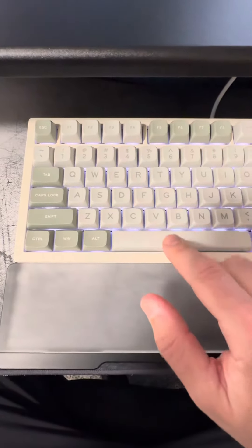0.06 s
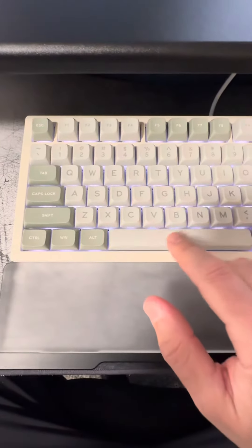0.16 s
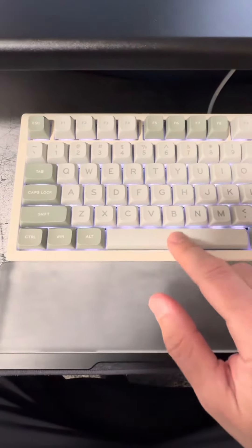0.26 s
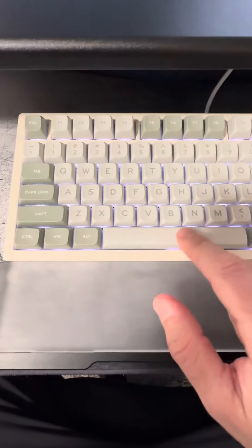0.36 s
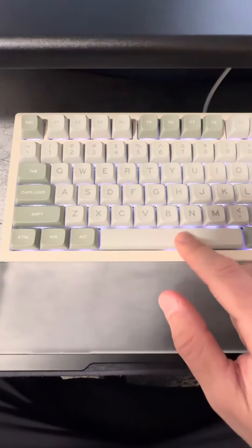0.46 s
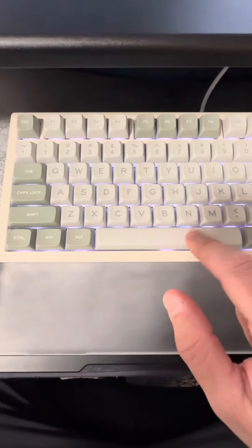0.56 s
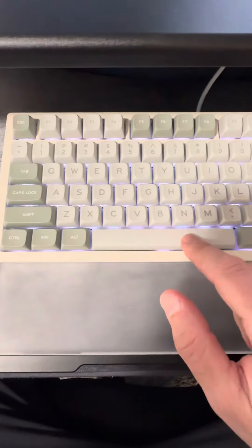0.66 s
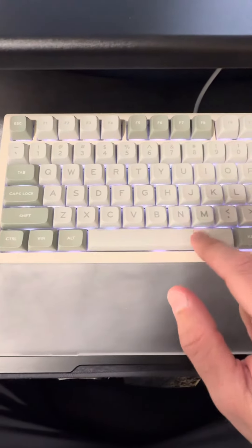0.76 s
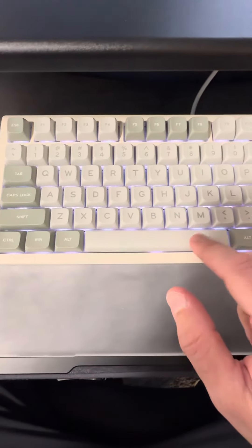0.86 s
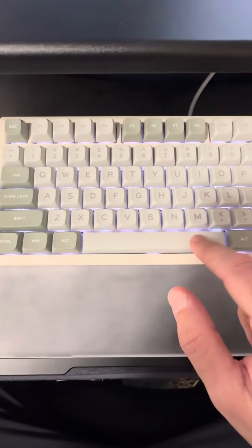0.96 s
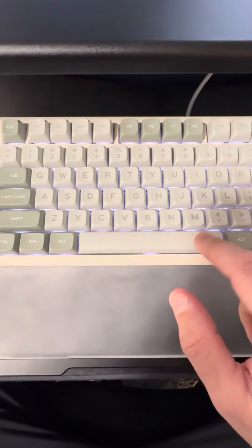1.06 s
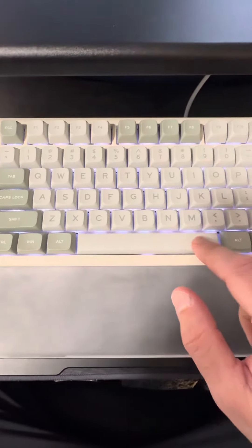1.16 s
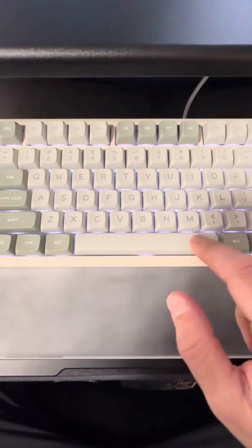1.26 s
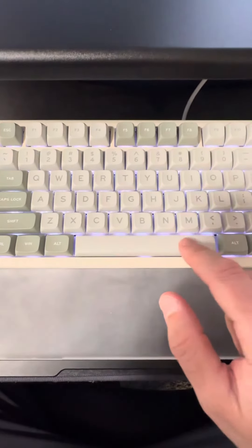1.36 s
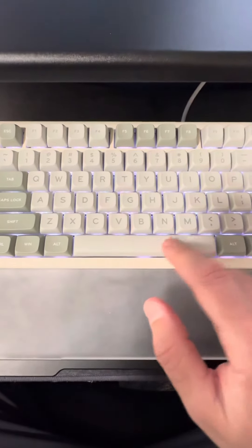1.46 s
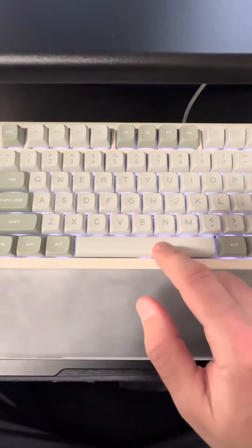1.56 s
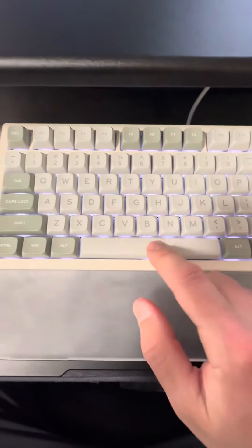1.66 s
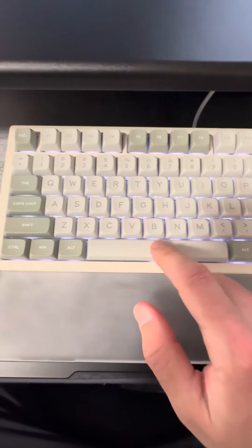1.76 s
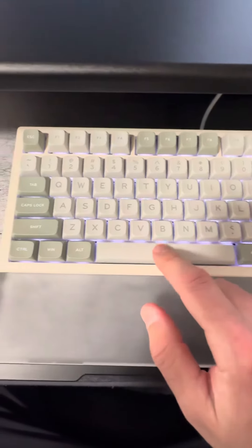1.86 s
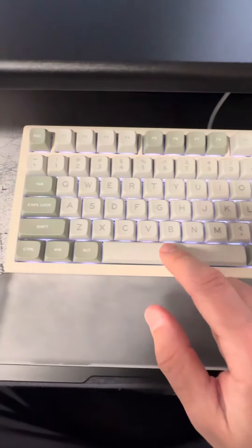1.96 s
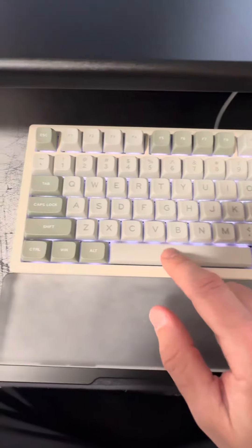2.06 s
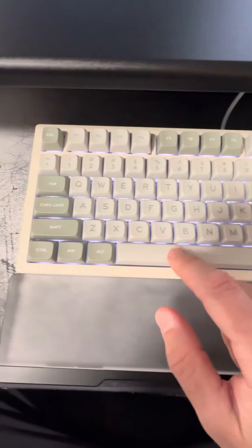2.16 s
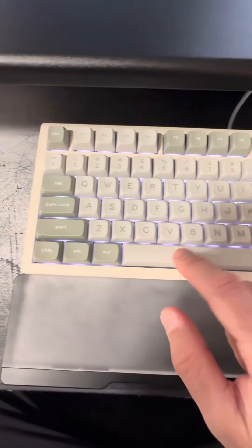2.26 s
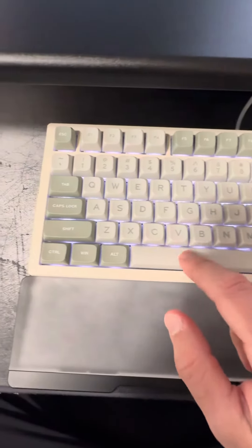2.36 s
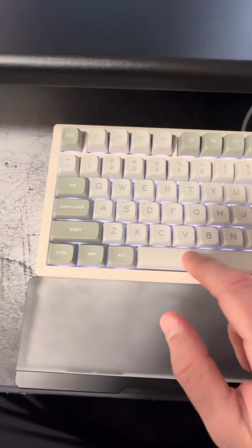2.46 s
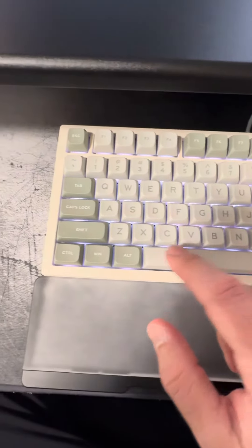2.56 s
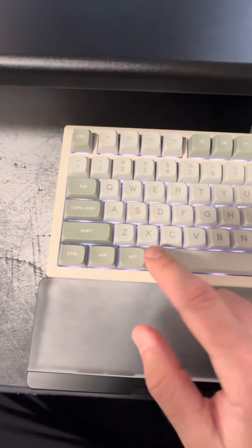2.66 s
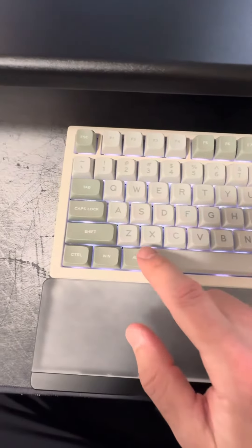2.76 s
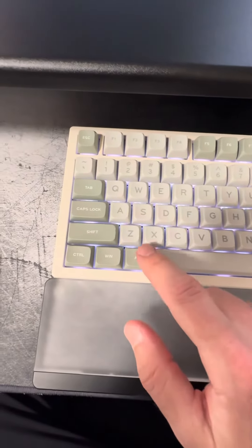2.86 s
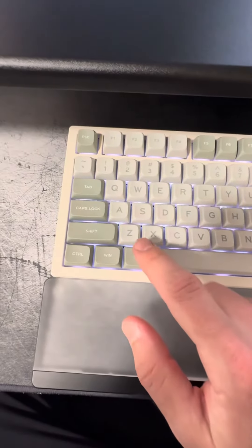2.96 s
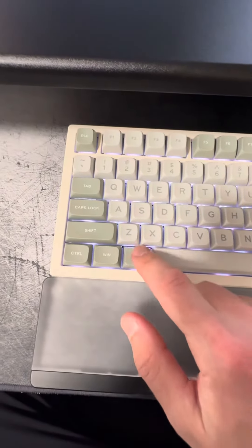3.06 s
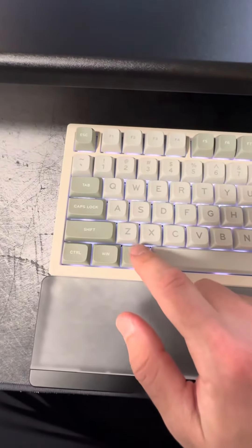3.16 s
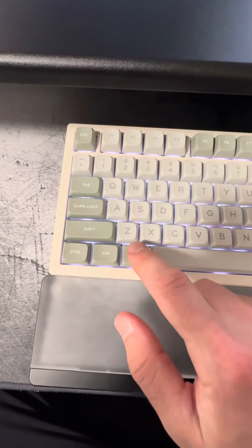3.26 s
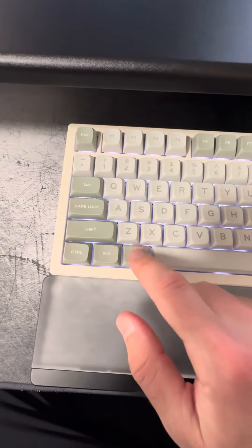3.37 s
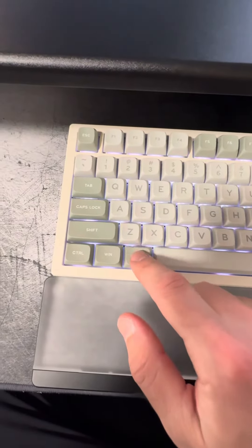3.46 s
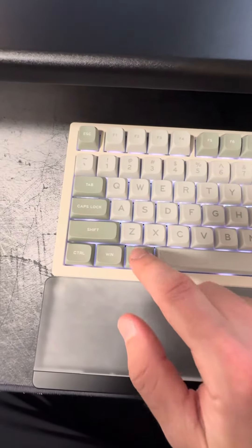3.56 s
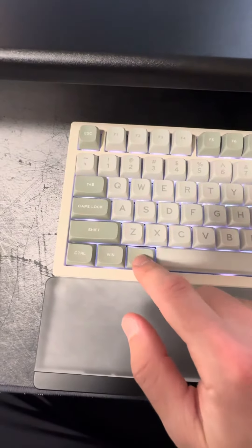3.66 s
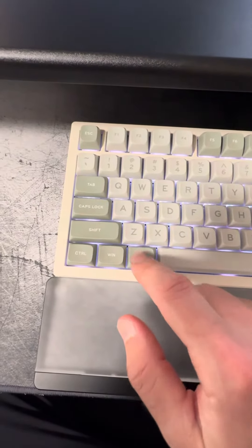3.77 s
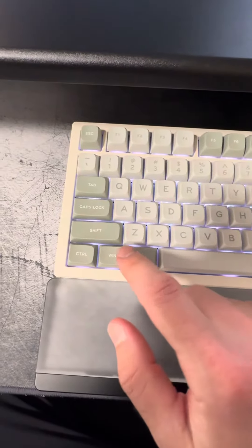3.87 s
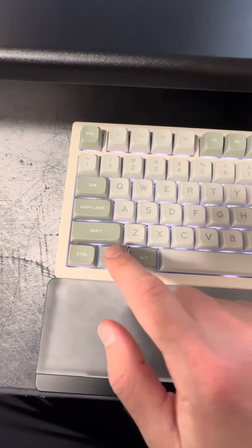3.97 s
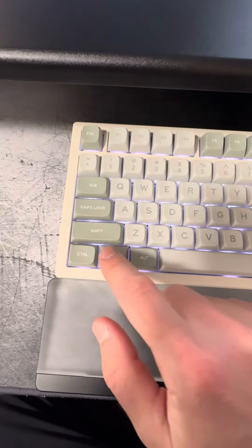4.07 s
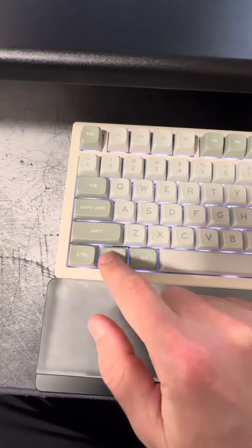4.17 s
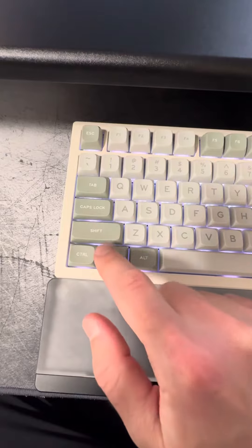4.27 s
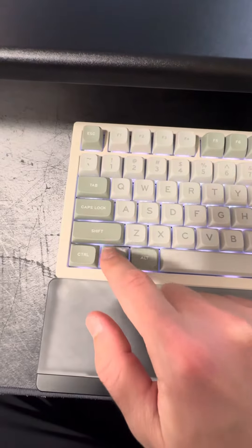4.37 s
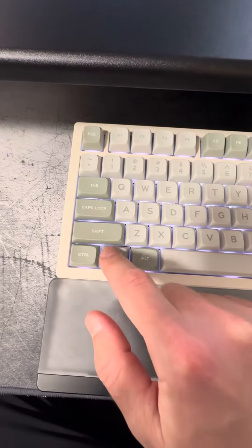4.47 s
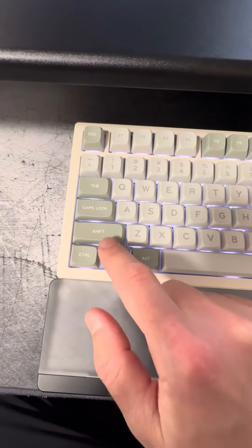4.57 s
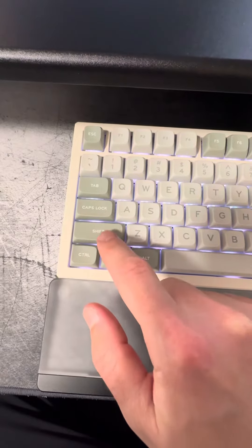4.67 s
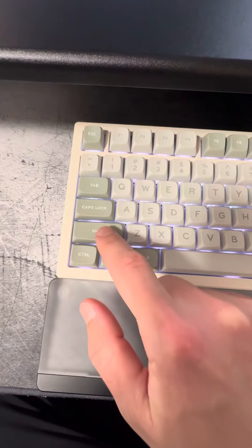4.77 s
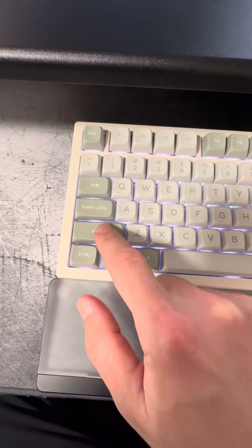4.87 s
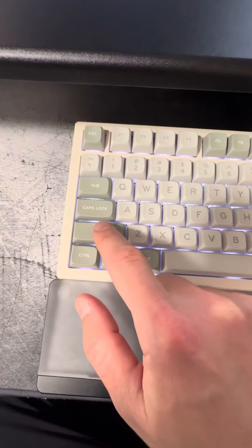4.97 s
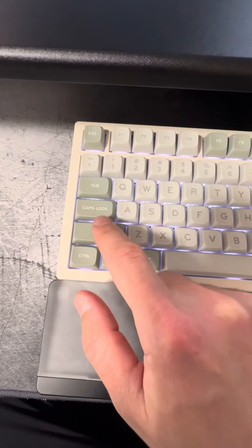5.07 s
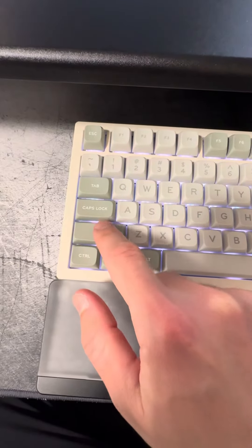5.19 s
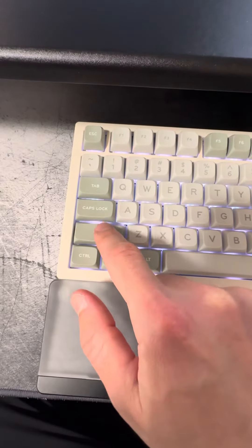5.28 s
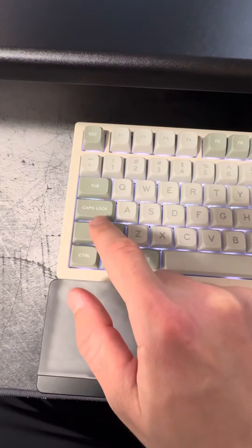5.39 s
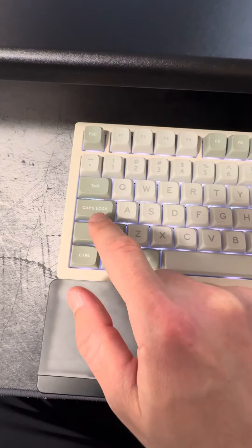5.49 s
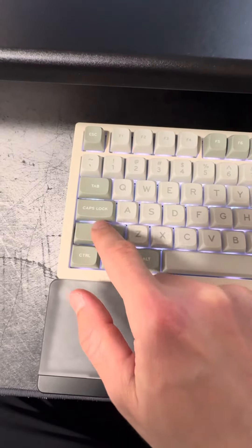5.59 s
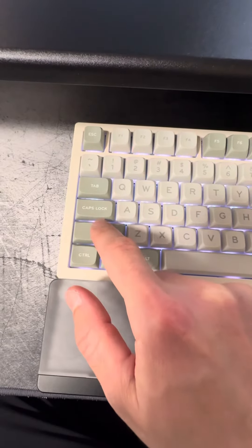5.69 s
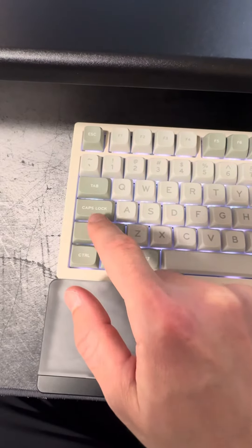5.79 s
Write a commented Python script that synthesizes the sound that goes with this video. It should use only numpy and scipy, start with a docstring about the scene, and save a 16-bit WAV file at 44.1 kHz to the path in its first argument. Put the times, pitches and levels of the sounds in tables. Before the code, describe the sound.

Close-up thocky key presses in a steady fast run, each with a softer spring-back, then seven scattered sharper single presses in a quiet room.

```python
"""A mechanical keyboard under one finger, close up: fourteen even strokes on the long bar, then three smaller keys.
Each stroke knocks at the bottom and, softer, as the key springs back: damped plastic modes with a crack of noise,
then a thin ring and a buzz. Light taps, ticks and noisy stem scrapes sit between the knocks.
Weak delayed copies and fading noise make the shelf and small room; the desk gives two low sine thuds.
Under it a computer fan runs: shaped noise, blade tones, a wavering hum and a thin electric whine."""
import sys
import numpy as np
from scipy import signal
from scipy.fft import rfft, irfft, next_fast_len
from scipy.io import wavfile
from scipy.ndimage import map_coordinates

SR = 44100
rng = np.random.default_rng(int(sys.argv[2]) if len(sys.argv) > 2 else 0)


def unload_audio(sound):
    """Save the sound as a 16-bit wav file, at the path given as the first command line argument."""
    columns = np.transpose(np.atleast_2d(sound))
    # keep every value between -1 and 1, then stretch to whole-number steps
    steps = np.round(np.clip(columns, -1, 1) * 32767)
    wavfile.write(sys.argv[1], SR, steps.astype(np.int16))


N = 257103

# keys hitting bottom: (time [s], level [dB])
PRESSES = [(0.0517, -9), (0.2325, -7.5), (0.399, -8), (0.5906, -7), (0.772, -8), (0.958, -8), (1.1327, -8),
           (1.3041, -7), (1.4871, -7), (1.664, -8), (1.8288, -8.5), (2.0118, -8.5), (2.1844, -9),
           (2.3701, -10), (3.042, -6), (3.377, -5), (3.6513, -5), (4.0991, -3), (4.3648, -1), (5.1798, -5),
           (5.5435, -3.5)]
# keys springing back against their top stop: (time [s], level [dB])
RELEASES = [(-0.045, -13.5), (0.1339, -15.5), (0.3146, -16), (0.4874, -15.5), (0.6801, -17),
            (0.8604, -15.5), (1.0383, -16.5), (1.2161, -16), (1.3861, -16), (1.5684, -15.5), (1.7419, -17),
            (1.9141, -17.5), (2.0923, -16.5), (2.2605, -16), (2.4528, -17.5), (3.1271, -21.5),
            (3.4648, -25), (3.7361, -22.5), (4.1963, -18), (4.4646, -16), (5.3026, -20), (5.6519, -22)]
# a released small key strikes its stop again: (time [s], level [dB])
REBOUNDS = [(3.7374, -26), (3.74, -25), (4.1996, -26), (4.4676, -21), (5.3049, -28.5)]
# the fingertip lands on the cap just before a press: (time [s], level [dB])
TOUCHES = [(0.038, -39), (0.223, -40.5), (0.3895, -38), (0.579, -30), (.759, -29), (0.9444, -28.5),
           (1.1173, -27.5), (1.2914, -26), (1.4764, -32.5), (1.996, -43), (2.171, -44.5), (3.032, -37),
           (3.3687, -32.5), (3.642, -32), (4.086, -33), (4.356, -36.5)]
# the held bar ticks once: (time [s], level [dB])
RATTLES = [(.107, -33.5), (.280, -36.5), (1.1935, -39.5), (2.0755, -44.5)]

# modes of each key in its plate:
# (frequency [Hz], width [Hz], relative spectral level pressed [dB], the same released [dB])
BAR_MODES = [(154, 83, -13.5, -14.5), (280, 32, -17.5, -19.5), (390.3, 100, -10, -11), (632, 120, -9, -15),
             (938, 200, -16.5, -10), (1249, 360, -0.5, -3), (1576, 600, -9.5, -19), (2183, 240, 0.5, -13),
             (2819, 410, -7, -14.5), (3770, 440, -8, -18.5), (4547, 730, -12, -20),
             (5836, 210, -10.5, -17.5), (6533, 240, -17, -14.5), (8300, 2200, -19, -19),
             (10287, 600, -21, -19), (12040, 2200, -22, -23), (13930, 990, -21, -20),
             (15500, 560, -25, -24.5)]
NEXT_KEY_MODES = [(395, 300, -26.5, -18), (873, 280, -11.5, -9.5), (1254, 280, -3, -9.5),
                  (1771, 220, -5, -15), (2458, 560, 2, -14), (3782, 800, -6.5, -28),
                  (5530, 930, -17.5, -22.5), (8120, 1000, -8.5, -24), (13900, 1900, -14, -17.5)]
CORNER_KEY_MODES = [(800, 280, -11, -6.5), (1525, 570, 5.5, 2), (1900, 580, 8.5, 1.5), (2210, 420, 5, -3.5),
                    (2740, 520, 1.5, -6), (4650, 300, -33.5, -29.5), (3855, 560, -3, -19.5),
                    (5540, 420, -24, -24.5), (7880, 1300, -16.5, -15), (12000, 2300, -19.5, -21.5),
                    (15050, 830, -19, -15)]
WIDE_KEY_MODES = [(368, 145, -13, 2.5), (564, 76, -19, -4), (779, 180, -9, -29), (1097, 387, -1.5, 6),
                  (1575, 430, 1.5, -11), (2216, 740, 0, 5.5), (2710, 280, -6, -40),
                  (3517, 720, -14.5, -10.5), (5700, 1860, -14, -13), (7740, 3100, -27, -22),
                  (9965, 870, -19.5, -14.5), (13400, 2100, -20, -19)]
KEY_MODES = [BAR_MODES, NEXT_KEY_MODES, CORNER_KEY_MODES, WIDE_KEY_MODES]
MOVES_S = [2.8, 3.9, 4.8]  # the finger changes key at these times

# a cap lightly tapped, small keys then the bar: (frequency [Hz], width [Hz], relative spectral level [dB])
SMALL_CAP_MODES = [(1340, 170, 0), (2520, 540, -2.5), (7600, 1800, -26.5)]
BAR_CAP_MODES = [(1650, 650, 0), (2700, 700, -9), (6000, 1500, -23)]

# slow ring of the bar's hollow and steel wire, then of the two small keys, then of the wide one:
# (frequency [Hz], level against the blow [dB], time to fall 60 dB [s])
BAR_RING = [(545.6, -35.5, 0.1), (1240, -44.5, .15), (4490, -38.5, 0.076), (5790, -29, 0.078),
            (6630, -40, 0.13)]
SMALL_RING = [(2150, -37, .12)]
WIDE_RING = [(2160, -40, .13), (3360, -44, 0.14), (5940, -53, .1)]
KEY_RINGS = [BAR_RING, SMALL_RING, SMALL_RING, WIDE_RING]
RING_BLUR_HZ = 25  # the ring's phase wanders, which widens each line

# usual brightness of each key's blows:
# (pressed [dB/octave], released [dB/octave], touched [dB/octave], grazed [dB/octave], rattled [dB/octave])
HARDNESS = [(0.28, -1.4, -.3, .3, -3), (0, 1, -7.5, 12.5), (2.4, -0.9, -5.5, 7.5), (2, 0.85)]
HARDER_PER_DB = 0.09  # dB/octave gained for each dB above the key's usual level
# how slowly each key's modes swell: (factor [1]) per key
SLOWER = [0.72, 0.8, 1.2, 1.8]
# buzz and room of each key: (level [dB], tilt [dB/octave])
AFTER = [(4, 0), (0.5, -1.5), (0.7, -0.1), (1.8, -2.3)]
# the fingertip grazes the cap's edge before it lands: (lead [s]) per key, then (level against landing [dB])
GRAZE_S = [0.0024, .004, 0.0032]
GRAZE_DB = [-8.5, -11, -3]
SCRAPE_DB, SCRAPE_S = [-41.5, -48, -46.5, -55.5], [.0035, .005, .008, .011]  # level and length, key by key

# nearby surfaces: (delay [s], level [dB])
WALLS = [(.0082, -29), (0.0099, -25), (0.018, -28)]
WALL_HZ = 6000  # the copies are duller above this
# fading of the small room: (frequency [Hz], time to fall 60 dB [s], relative level [dB])
ROOM = [(150, 0.93, 9), (396, 0.89, 13), (970, 0.22, 8), (2540, 0.38, -2.5), (4300, 0.3, 2.5),
        (6000, 0.29, 7.5), (7800, 0.11, 8), (10150, 0.58, -6), (15000, .24, -6.5)]
# the room at the two ports: (frequency [Hz], likeness [-1..1])
ROOM_ALIKE = [(300, 0.27), (1000, .3), (2300, 0.1), (4000, -0.29), (8000, -0.17), (10500, -.93),
              (12000, -.99)]
# near sound at the two ports: (frequency [Hz], left minus right [dB])
NEAR_LEAN = [(150, -1), (400, -3), (700, -6), (1290, -1), (1790, 0), (2740, -2.5), (4400, 3.5), (6400, 3),
             (15000, .3)]
# phase between the ports: (frequency [Hz], lead of the left [rad])
NEAR_LEAD = [(500, 0.25), (860, 1.09), (1300, .5), (2330, 0.25), (3100, 1.12), (4300, 0.58), (5200, 1),
             (5700, -1.14), (7800, -1.5), (9800, -2), (12200, -3), (14500, -2)]

# colour of the fan's air noise: (frequency [Hz], relative level [dB])
AIR = [(30, -32.5), (43, -15), (62, -13), (83, -21.5), (214, -27), (321, -32), (433, -26.5), (1060, -29),
       (1600, -40), (3320, -45.5), (3910, -56.5), (7000, -59), (10000, -67.5), (16500, -82)]
# air noise at the two ports: (frequency [Hz], likeness [-1..1])
AIR_ALIKE = [(60, 0.78), (300, 0.95), (700, -0.97), (1400, 1), (3000, 0.095), (7000, 0.93), (12000, -0.7)]
# balance of everything in the fan layer: (frequency [Hz], left minus right [dB])
FAN_LEAN = [(60, -1.5), (380, -2.5), (700, -7.5), (1290, -8), (2380, -1.5), (4400, -3), (15000, 4.5)]
# blade tones: (multiple of the fan's rate [1], relative level [dB])
BLADE_ORDERS = [(3, -82), (4, -74.5), (10, -81), (16, -80.5), (20, -83)]
AIR_DB, FAN_HZ, HUM_HZ = -61, 53.5, 55  # mean air level, mean fan rate, mean hum pitch
# slow course of the wavering hum: (time [s], level [dB])
HUM = [(.5, -61.5), (1.7, -56.5), (4, -58.5)]
# a thin electric tone: (time [s], frequency [Hz], level [dB])
WHINE = [(0, 3275, -74), (4.5, 3238, -79), (5.83, 3210, -100)]
UPPER_HZ, UPPER_DB = 3358, -9  # a fainter tone above it, level against it
# the desk top gives under the hand: (time [s], frequency [Hz], level [dB])
THUDS = [(4.41, 126.8, -53), (5.57, 133, -57.5)]

TOP_HZ = 17050  # band limit of the recorder
OVERLOAD = 1.4  # amplitude near which the microphone rounds off peaks


def amp(db):
    """Amplitude of a level in dB."""
    return 10 ** (np.asarray(db) / 20)


def unit(x):
    """x scaled to an rms of 1."""
    return x / np.sqrt(np.mean(x ** 2) + 1e-20)


def along(points, hz, axis=1):
    """One column of a table by frequency, read on a log axis."""
    rows = np.transpose(points)
    return np.interp(np.log(hz + 1), np.log(rows[0] + 1), rows[axis])


def wobble(rate):
    """A smooth random curve, rate knots a second."""
    knots = rng.standard_normal(int(N * rate / SR) + 4)
    return map_coordinates(knots, [np.arange(N) * rate / SR])


def filtered(x, response):
    """x times a complex response of frequency."""
    m = next_fast_len(N + SR // 2)
    return irfft(rfft(x, m) * response(np.fft.rfftfreq(m, 1 / SR)), m)[..., :N]


def tilted(x, db, octave_db):
    """A short sound at another level, sloped about 2 kHz and flat below 1 kHz."""
    hz = np.fft.rfftfreq(len(x), 1 / SR)
    slope = octave_db * np.log2(np.maximum(hz, 1000) / 2000)
    return irfft(rfft(x) * amp(db + slope), len(x))


def pair(mid_side, alike, gain):
    """Left and right from two unrelated signals, alike by frequency."""
    def turn(hz):
        return np.arccos(np.clip(along(alike, hz), -.99, .99)) / 2

    mid, side = filtered(mid_side, lambda hz: gain(hz) * [np.cos(turn(hz)), np.sin(turn(hz))])
    return np.array([mid + side, mid - side])


def fan():
    """Air noise, blade orders of a slightly unsteady fan, the hum and the whine."""
    t = np.arange(N) / SR
    air = pair(rng.standard_normal((2, N)), AIR_ALIKE, lambda hz: amp(along(AIR, hz)))
    air = amp(AIR_DB + 1.5 * wobble(13.0)) * unit(air)

    phase = 2 * np.pi * np.cumsum(FAN_HZ * (1 + 0.0041 * wobble(1.2))) / SR
    blades = sum(amp(db + 3.5 + 1.4 * wobble(2.8)) * np.sin(order * phase) for order, db in BLADE_ORDERS)

    hum_level = amp(np.interp(t, *np.transpose(HUM)) + 2.7 * wobble(5))
    hum = hum_level * np.sin(2 * np.pi * np.cumsum(HUM_HZ + 1.5 * wobble(4)) / SR)

    times, pitches, levels = np.transpose(WHINE)
    whine_hz, whine_db = np.interp(t, times, pitches), np.interp(t, times, levels)
    whine = amp(whine_db + 1.5 * wobble(0.83)) * np.sin(2 * np.pi * np.cumsum(whine_hz) / SR)
    whine += amp(whine_db + UPPER_DB + 3.7 * wobble(1.5)) * np.sin(2 * np.pi * UPPER_HZ * t)
    return filtered(air + blades + hum + whine, lambda hz: amp(along(FAN_LEAN, hz) * [[.5], [-.5]]))


def key_at(s):
    """Index of the key under the finger."""
    return np.searchsorted(MOVES_S, s)


def hardened(rows, axis, per_db):
    """(time, level, hardness): the key's usual hardness, more for a stronger blow."""
    def usual(s):
        return np.mean([db for other, db in rows if key_at(other) == key_at(s)])

    return [(s, db, HARDNESS[key_at(s)][axis] + per_db * (db - usual(s))) for s, db in rows]


def knock(modes, axis, hardness_db, cycles, crack_db):
    """One blow: damped plastic modes of joint peak 1, the low ones slower to swell, plus a crack of noise."""
    t = np.arange(SR // 25) / SR
    hz, width, db = (np.transpose(modes)[k][:, None] for k in (0, 1, axis))
    # blows differ a little in mode dB, phase and pitch
    chance = rng.standard_normal((3, len(modes), 1)) * [[[.7]], [[.1]], [[.005]]]
    size = width * amp(db + hardness_db * np.log2(hz / 2000) + chance[0])
    turn = np.pi * np.arange(len(modes))[:, None] + chance[1]  # neighbouring modes start opposed
    swell = (1 - np.exp(-t / (cycles / hz + 0.00022))) ** 2
    swing = np.sin(2 * np.pi * hz * (1 + chance[2]) * t + turn)
    body = np.sum(size * swell * np.exp(-np.pi * width * t) * swing, 0)

    bright_noise = np.diff(np.diff(rng.standard_normal(len(t) + 2)))
    crack = swell[-1] * amp(crack_db - 60 * t / 0.015) * bright_noise
    return body / np.max(np.abs(body)) + crack


def ring_on(ring):
    """A key's slow modes, a little different at every blow."""
    t = np.arange(SR // 5) / SR
    hz, db, t60 = np.transpose(ring)[:, :, None]
    chance = rng.standard_normal((3, len(ring), 1)) * [[[3]], [[.004]], [[3]]]  # dB, pitch, phase
    steps = rng.standard_normal((len(ring), len(t)))
    wander = np.cumsum(steps, 1) * np.sqrt(2 * np.pi * RING_BLUR_HZ / SR)
    swing = np.sin(2 * np.pi * hz * (1 + chance[1]) * t + chance[2] + wander)
    fade = amp(db + chance[0] - 60 * t / t60)
    return np.sum(fade * np.minimum(t / 0.00067, 1) * swing, 0)


def tail():
    """A fresh stereo room answer, left energy 1; each frequency dies at its own speed."""
    hz, t, z = signal.stft(rng.standard_normal((2, SR // 4)), SR, nperseg=256)
    fade = amp(along(ROOM, hz, axis=2)[:, None] - 60 * t / along(ROOM, hz)[:, None])
    out = signal.istft(z * fade, SR, nperseg=256)[1]
    out = out * (1 - np.exp(-np.arange(out.shape[1]) / (0.00043 * SR)))  # soft onset
    return out / np.linalg.norm(out[0])


def keys():
    """Every contact, straight from the keyboard and as the room returns it."""
    near, far = np.zeros(N + 2 * SR), np.zeros((2, N + 2 * SR))  # a second to spare at both ends
    t = np.arange(SR // 20) / SR
    grazes = [(s - GRAZE_S[key_at(s)], db + GRAZE_DB[key_at(s)]) for s, db in TOUCHES]
    presses = hardened(PRESSES, axis=0, per_db=HARDER_PER_DB)
    releases = hardened(RELEASES + REBOUNDS, axis=1, per_db=HARDER_PER_DB)
    taps = hardened(TOUCHES, axis=2, per_db=0) + hardened(grazes, axis=3, per_db=0)
    taps += hardened(RATTLES, axis=4, per_db=0)
    tap_modes = [BAR_CAP_MODES] + 3 * [SMALL_CAP_MODES]
    # (contacts, modes by key, level column, swell [cycles], crack [dB], second landing [dB], buzz [dB])
    kinds = ((presses, KEY_MODES, 2, .4, -29, -16, -14),
             (releases, KEY_MODES, 3, .7, -29, -10, -8),
             (taps, tap_modes, 2, 1.6, -30, -3, -6))
    for rows, modes_by_key, axis, swell, crack_db, bounce_db, buzz_db in kinds:
        for s, db, hardness_db in rows:
            key = key_at(s)
            modes, cycles = modes_by_key[key], swell * SLOWER[key]
            blow = knock(modes, axis, hardness_db, cycles, crack_db)
            late = round((0.0015 + .0003 * rng.random()) * SR)  # the cap rocks and lands a second time
            blow[late:] += amp(bounce_db) * knock(modes, axis, hardness_db, cycles, crack_db)[:-late]
            blow *= amp(db)
            # the listed time falls where the blow first passes half its peak
            at = round((s + 1) * SR) - np.argmax(np.abs(blow) > np.max(np.abs(blow)) / 2)
            near[at:at + len(blow)] += blow
            near[at:at + SR // 5] += amp(db) * ring_on(KEY_RINGS[key])

            # only the start of the blow feeds the buzz and the room
            spread = tilted(blow * np.exp(-t[:len(blow)] / 0.0008), *AFTER[key])
            # the loose caps shake
            buzz = amp(-60 * t / 0.042) * np.minimum(t / 0.0027, 1) * rng.standard_normal(len(t))
            buzz /= np.linalg.norm(buzz)
            near[at:at + len(t)] += amp(buzz_db) * signal.fftconvolve(spread, buzz)[:len(t)]
            wet = signal.fftconvolve(spread[None], tail(), axes=1)
            far[:, at:at + wet.shape[1]] += wet
    return near[SR:SR + N], far[:, SR:SR + N]


def slides():
    """The stem scrapes in its housing: band noise that swells up to the landing and is cut off 2 ms after it."""
    t, level = np.arange(N) / SR, np.zeros(N)
    for s, _ in PRESSES:
        key = key_at(s)
        level += amp(SCRAPE_DB[key]) * np.exp(-((s - t) / SCRAPE_S[key]) ** 2) * (t < s + .002)

    def band(hz):
        return 1 / (1 + (900 / (hz + 1)) ** 4) / (1 + (hz / 3000) ** 1.8)

    grit = amp(5 * wobble(400))
    return level * grit * unit(filtered(rng.standard_normal(N), band))


def ports(x):
    """Near sound reaches the two ports with its own level and phase at each; desk and shelf add weak copies."""
    def echoes(hz):
        copies = sum(amp(db) * np.exp(-2j * np.pi * hz * s) for s, db in WALLS)
        return 1 + copies / (1 + (hz / WALL_HZ) ** 2)

    def half(hz):
        return amp(along(NEAR_LEAN, hz) / 2) * np.exp(.5j * along(NEAR_LEAD, hz))

    return filtered(x, lambda hz: echoes(hz) * np.array([half(hz), 1 / half(hz)]))


def desk():
    """Soft low sine thuds without an edge, each fullest 30 ms after its listed time."""
    t = np.arange(N) / SR
    return sum(amp(db) * np.exp(-((t - s - .03) / 0.022) ** 2) * np.sin(2 * np.pi * hz * t)
               for s, hz, db in THUDS)


def scene():
    """Keyboard and its room, thinned in the bass, over the desk and the fan."""
    near, far = keys()
    board = ports(near + slides()) + amp(-9.0) * pair(far, ROOM_ALIKE, np.ones_like)
    # a board this small sends out little bass
    board = filtered(board, lambda hz: (1j * hz / (200 + 1j * hz)) ** 2)
    return board + desk() + fan()


def record(dry):
    """The microphone rounds off the hardest peaks; the recorder keeps nothing above its band limit."""
    rounded = dry / np.sqrt(1 + (dry / OVERLOAD) ** 2)
    return filtered(rounded, lambda hz: np.clip((TOP_HZ - hz) / 350, 0, 1) ** 2)


dry = scene()
out = record(dry)
unload_audio(out)
```